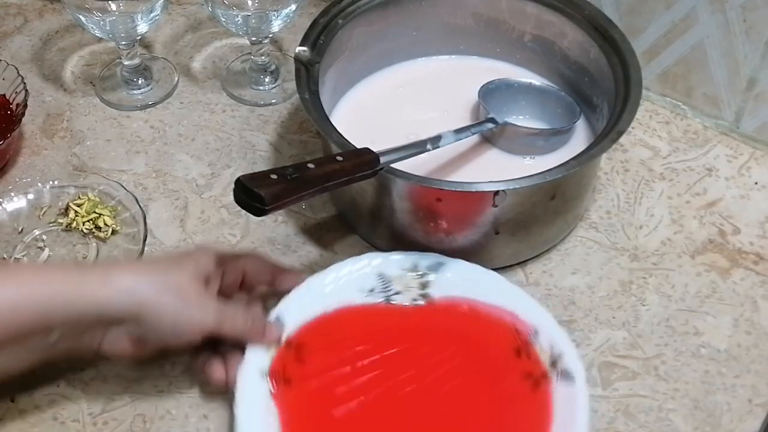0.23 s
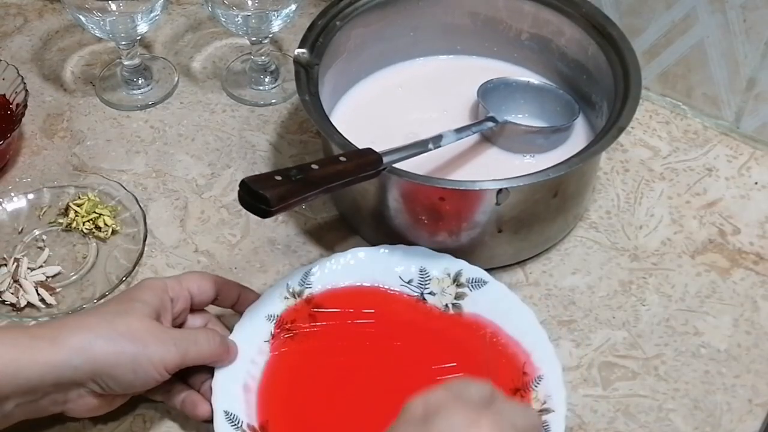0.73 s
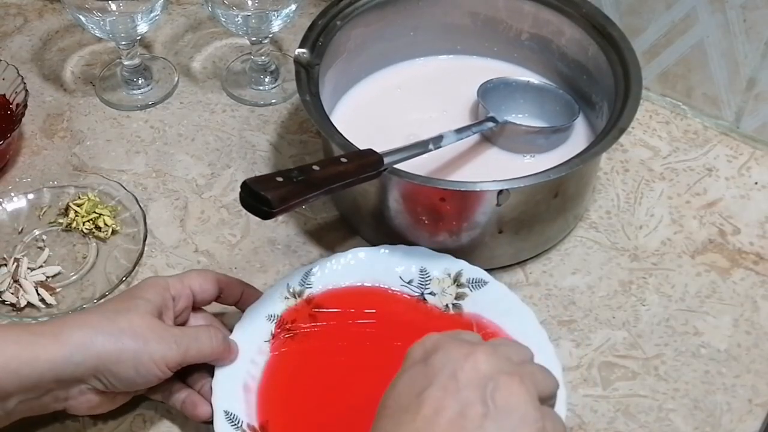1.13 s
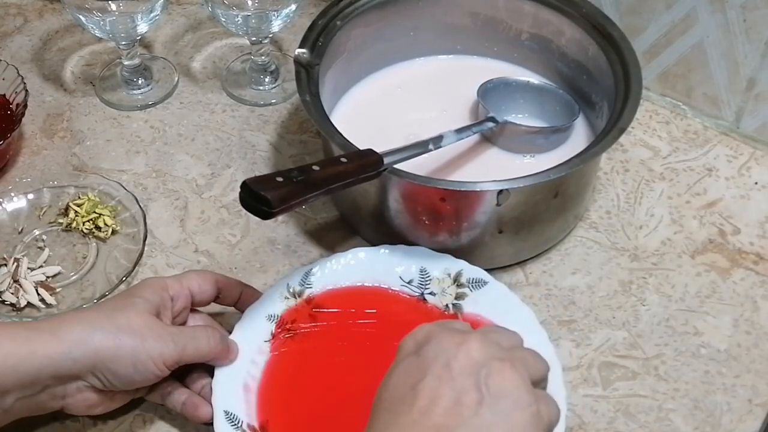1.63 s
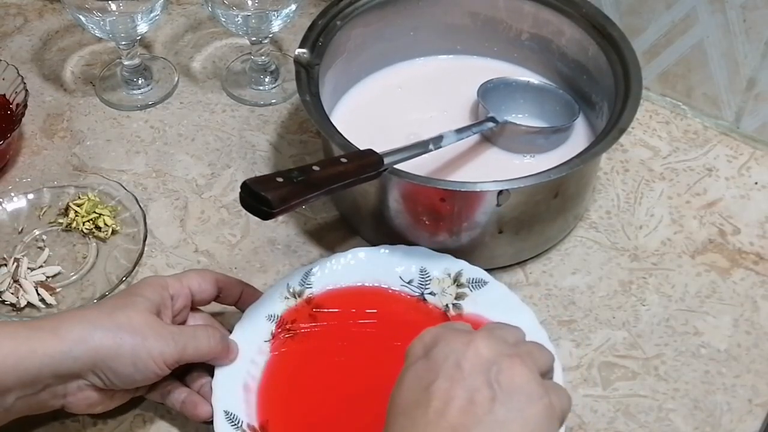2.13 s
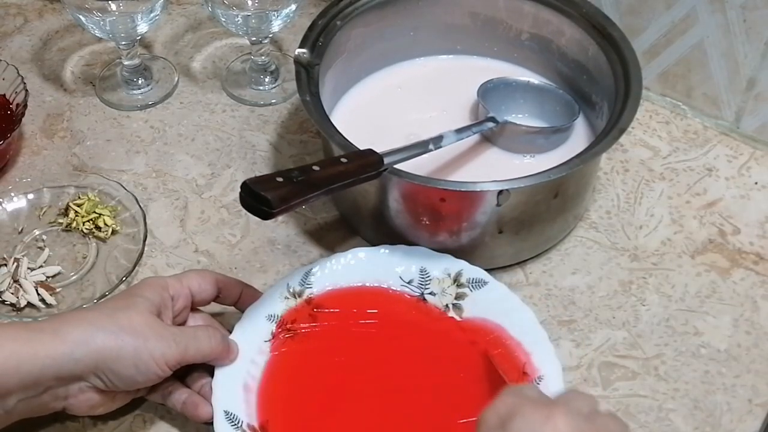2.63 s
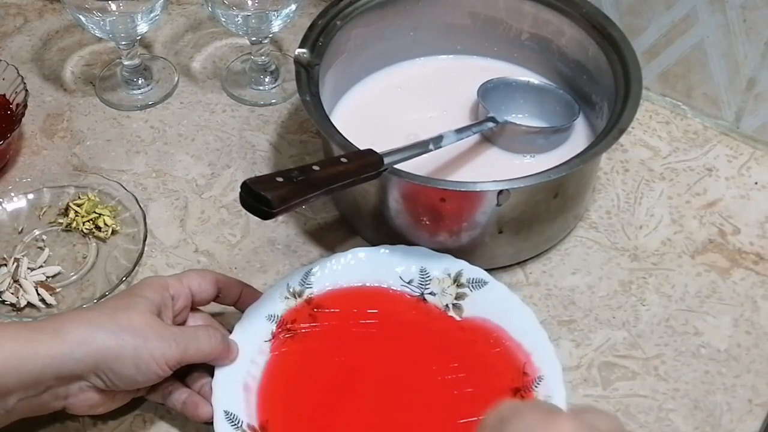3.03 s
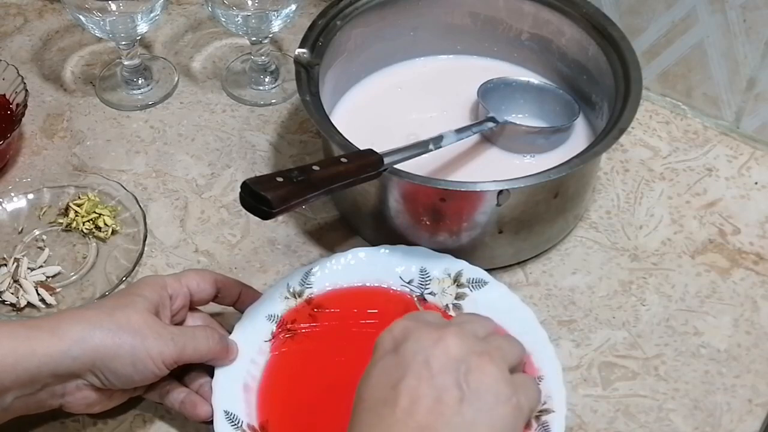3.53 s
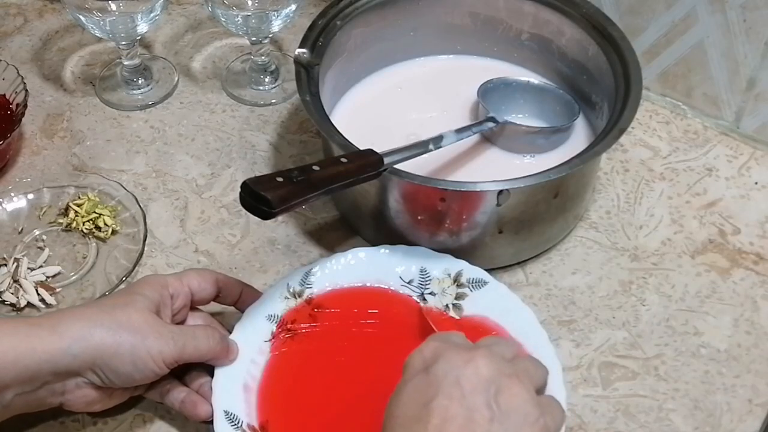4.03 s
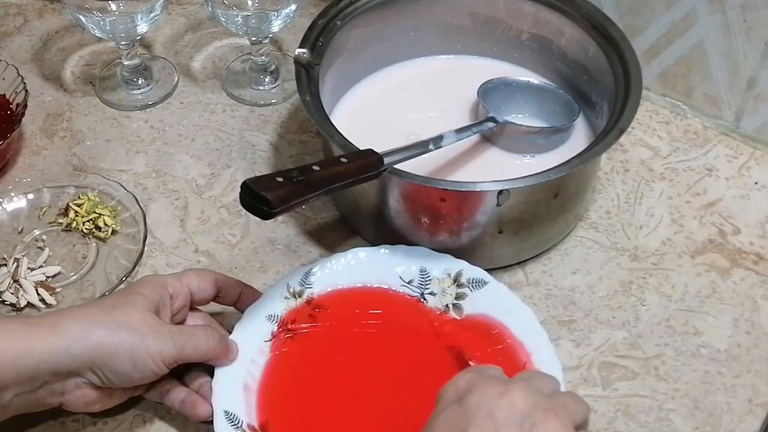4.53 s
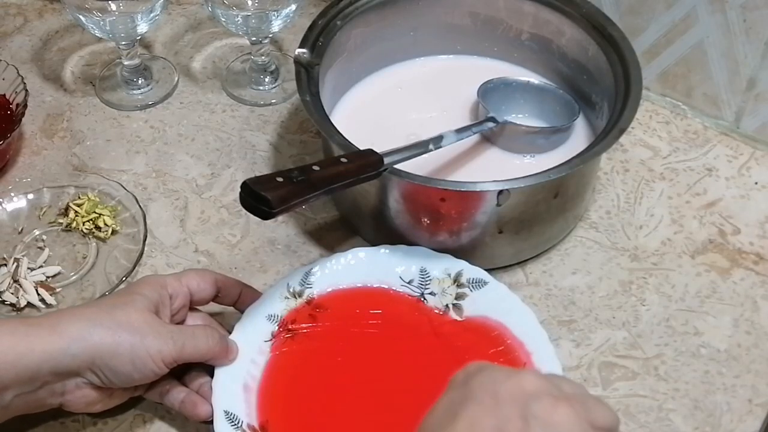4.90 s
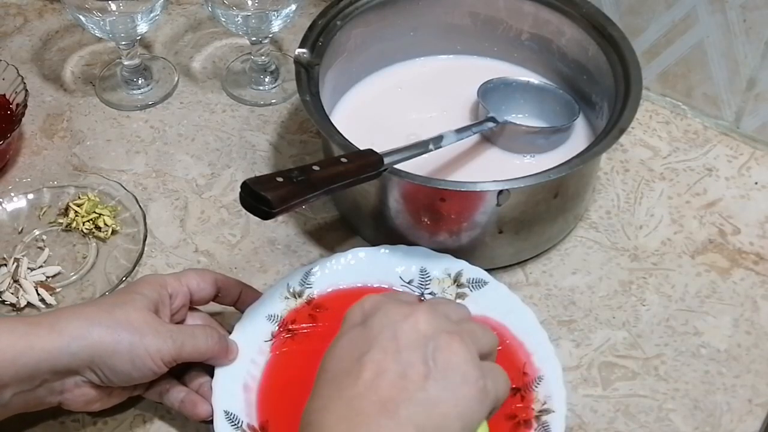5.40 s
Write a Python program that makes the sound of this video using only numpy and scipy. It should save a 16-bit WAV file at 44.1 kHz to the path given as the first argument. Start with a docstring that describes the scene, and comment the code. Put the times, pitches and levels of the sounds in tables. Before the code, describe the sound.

A small, quiet kitchen with a steady low hum and soft hiss is heard from close by. At about 0.2 seconds a china plate slides on a stone counter, then grinds to rest between 0.5 and 0.7 seconds, ringing lightly. A quiet stretch follows, with a faint judder near 1 second and a soft, dull knife tap at 2.2 seconds. At 3 seconds the steel tip, cutting through set jelly, strikes the plate in a quick run of bright clicks and squeaky scrapes, while the dragged plate judders softly until 3.5 seconds. The loudest click comes just before 4 seconds, followed by duller taps, scrapes and a small squeak until 4.3 seconds, with low juddering fading by 5 seconds. Another scrape then builds to a sharp tap at 5.2 seconds. The wet blade wipes faintly through the jelly from 5.4 to 5.7 seconds.

```python
"""A steel knife is drawn through set jelly in slow strokes, its tip tapping and scraping on a china plate.
Blows and tiny slips excite the modes of knife and plate; the wet blade wipes and squeaks faintly.
Before the cuts the plate is turned on a stone counter: its foot grinds and the china rings.
During them the dragged plate judders softly by stick and slip.
A small, quiet kitchen with a low hum, heard from close by."""
import sys
import numpy as np
from scipy import signal
from scipy.fft import rfft, irfft, next_fast_len
from scipy.io import wavfile
from scipy.ndimage import map_coordinates

SR = 44100
rng = np.random.default_rng(int(sys.argv[2]) if len(sys.argv) > 2 else 0)


def output_pcm(signal):
    """Save a mono or channel-first signal as 16-bit PCM at the path in sys.argv[1].

    Samples are clipped to [-1, 1] before scaling.
    """
    pcm = np.clip(np.atleast_2d(signal).T, -1, 1) * 32767
    wavfile.write(sys.argv[1], SR, np.round(pcm).astype(np.int16))


N = 249606
TIME_S = np.arange(N) / SR
FFT_SIZE = next_fast_len(N + SR // 5, True)
FREQ_HZ = np.fft.rfftfreq(FFT_SIZE, 1 / SR)

# Table levels are relative, ahead of normalising and mix gains.
# room air: freq_hz, level_db
AIR_SPECTRUM = [(20, -11.5), (38, -12.5), (55, -25.5), (130, -11), (190, -18), (300, -15.5), (450, -22.5),
                (1050, -32), (2200, -37.5), (2900, -37.5), (3900, -45.5), (5200, -40), (8500, -41.5),
                (11000, -49), (15500, -48.5)]
# left-right likeness of the air: freq_hz, correlation
AIR_CORRELATION = [(180, 0.85), (550, 0.58), (1650, 0.017)]
# appliance hum: pitch_hz, level_db
HUM_TONES = [(21.5, -54), (98, -66.5), (133, -68.5), (248, -67.5)]
# kitchen reverberation: freq_hz, t60_s
ROOM_DECAY = [(200, 0.18), (2000, 0.25), (6000, 0.23), (14000, 0.06)]

# flat of the blade wiping through jelly: start_s, length_s, level_db
BLADE_WIPES = [(4.67, 0.2, -67.5), (5.37, 0.29, -60.5), (5.61, 0.09, -54.5)]
# wet friction: freq_hz, level_db
WIPE_SPECTRUM = [(700, -26), (1800, -1), (2700, 1), (4000, -9), (7500, -6.5), (10000, -20), (15000, -27)]
# blade squeaks in jelly and on glaze: start_s, length_s, level_db, pitch_hz, glide_hz
BLADE_SQUEAKS = [(0.87, 0.29, -67, 1340, 130), (3.0045, 0.008, -24.5, 2780, 0),
                 (4.016, 0.026, -44, 1660, -60), (4.195, 0.06, -38, 1690, 0), (4.25, 0.2, -54, 1690, 0),
                 (4.42, 0.14, -72.5, 3520, 0)]
# faint high squeal in the first cut: time_s, pitch_hz, level_db
SQUEAL_PATH = [(2.04, 5300, -82), (2.13, 5300, -79), (2.21, 5120, -81), (2.29, 5950, -75.5),
               (2.36, 6170, -78.5), (2.43, 5950, -71), (2.47, 5550, -76), (2.5, 4600, -81)]

# dragged plate: start_s, length_s, level_db, pitch_hz, rough_db (re level)
PLATE_SHUDDERS = [(0.82, 0.34, -55, 130, -10), (2.975, 0.24, -40.5, 157, -5), (3.04, 0.075, -36, 158, -18),
                  (3.185, 0.135, -39.3, 159, -13), (3.32, 0.19, -44, 158, -12),
                  (3.895, 0.06, -45, 136, -14), (3.95, 0.15, -50, 136, -12), (4.09, 0.13, -43.5, 138, -14),
                  (4.22, 0.77, -50.5, 133, -11)]
# plate foot under light and heavy load: freq_hz, level_db
LIGHT_FOOT_SPECTRUM = [(200, -8.5), (350, -2), (1200, 1), (1700, -0.5), (2200, -12.5), (2850, -5),
                       (3800, -15), (5250, 1), (6050, -18), (6750, 0.5), (7500, -7), (8700, -10.5),
                       (9400, -11), (10500, -23), (15000, -21)]
HEAVY_FOOT_SPECTRUM = [(150, -27), (270, -2.5), (640, 0), (860, -11), (1150, 1), (1500, -12), (1880, -1),
                       (2150, -11), (3100, 0), (4100, -10), (5300, -0.5), (6100, -6), (7600, -3),
                       (10500, -17.5), (15000, -23)]
# resonances of the lightly sliding foot: freq_hz, width_hz, level_db
LIGHT_FOOT_MODES = [(750, 32, 12), (2864, 65, 3), (7530, 40, 6), (11600, 230, -9)]
# modes of the free plate: pitch_hz, level_db, t60_s
PLATE_MODES = [(651, -16, 0.35), (985, -7, 0.41), (1141, -6.5, 0.36), (1884, -4, 0.33), (2024, -11.5, 0.42),
               (2433, -4.5, 0.27), (2762, -9.5, 0.24), (3070, -7.5, 0.27), (3686, -13, 0.22),
               (7055, -13, 0.27)]

# knife and plate resonances, tip near the rim or in the well: freq_hz, width_hz, level_db
TIP_RIM_MODES = [(1810, 56, -1.5), (2580, 210, -1.3), (3030, 85, -6), (3850, 40, -5.5), (4330, 90, -16),
                 (5070, 34, -1.5), (5320, 75, -4.5), (6380, 55, -3), (7320, 60, -14), (9350, 130, -18)]
TIP_WELL_MODES = [(660, 90, -17.5), (1396, 70, -9), (1665, 62, 1), (1940, 85, -2.5), (2170, 130, -10),
                  (3845, 36, -13.5), (5270, 160, -18), (6350, 63, -17.5), (7400, 45, -19)]
# broad colour under those resonances: freq_hz, level_db
RIM_SPECTRUM = [(500, -23), (1000, -26.5), (1250, -10.5), (2500, -4), (3500, -11.5), (5200, -10),
                (7800, -8), (8700, -23.5), (11000, -20.5), (12000, -30), (15000, -32)]
WELL_SPECTRUM = [(350, -31.5), (650, -15), (980, -20.5), (1250, -1.5), (2000, -1), (2700, -9.5),
                 (3200, -21), (4500, -25.5), (7800, -11), (9000, -26), (11500, -31.5), (13000, -58)]
# tip blows: start_s, level_db, edge_db (treble gain), place (0 well to 1 rim)
TIP_TAPS = [(2.226, -36.5, -27, 0), (2.484, -51, -16, 0), (2.748, -52, 16, 1), (2.895, -50, 12, 1),
            (3.0063, -22.5, 5, 1), (3.1013, -25.5, 2, 1), (3.1512, -26, -3, 1), (3.9502, -18, 3, 0.25),
            (3.9537, -21.5, 6, 0.15), (3.9572, -21, 9, 0.24), (4.056, -37.5, -12, 0), (4.0918, -24.5, 0, 0),
            (4.1197, -28.5, -2, 0), (4.1665, -27, -3, 0.19), (4.2835, -30, -6, 0), (4.297, -30, -1, 0.1),
            (5.185, -22.5, -1, 0.58)]
# tip pulls over the glaze: start_s, length_s, level_db, growth_db, edge_db, place, chatter_hz
TIP_PULLS = [(3.002, 0.036, -43.5, -7, 1, 1, 2750), (3.046, 0.078, -38, 1, -3, 1, 2520),
             (3.122, 0.05, -39.3, -1, -2, 1, 2600), (3.196, 0.062, -39.5, -1, -3.7, 1, 2560),
             (3.965, 0.03, -46, -4, -9, 0, 1900), (4.072, 0.035, -44, -2, -14, 0, 2100),
             (4.162, 0.142, -38.6, -1, -15, 0, 1690), (4.998, 0.07, -41.7, -3, -7.5, 1, 2420),
             (5.074, 0.107, -39, 4, -4.3, 1, 2560), (5.176, 0.034, -35.2, -1, -1.5, 1, 2750)]


def amp(db):
    """Decibels to gain."""
    return 10 ** (np.asarray(db) / 20)


def unit_rms(x):
    """Scale to rms 1."""
    return x / np.sqrt(np.mean(np.abs(x) ** 2) + 1e-20)


def curve(points, hz=FREQ_HZ):
    """Interpolate (freq_hz, value) points on a log axis."""
    point_hz, values = np.transpose(points)
    return np.interp(np.log(hz + 1), np.log(point_hz), values)


def wobble(rate_hz):
    """Smooth random curve through Gaussian knots."""
    knots = rng.standard_normal(int(N * rate_hz / SR) + 4)
    grid = np.arange(len(knots) * 8) / 8
    return np.interp(TIME_S * rate_hz, grid, map_coordinates(knots, [grid], mode="nearest"))


def wavering(hz, drift, rate_hz):
    """Tone of rms 1; pitch strays at random by the fraction drift."""
    return np.sqrt(2) * np.sin(2 * np.pi * np.cumsum(hz * (1 + drift * wobble(rate_hz))) / SR)


def ramp(start_s, length_s):
    """0 to 1 over a gesture."""
    return np.clip((TIME_S - start_s) / length_s, 0, 1)


def swell(start_s, length_s):
    """Soft gesture: a broadened half sine."""
    return np.abs(np.sin(np.pi * ramp(start_s, length_s))) ** 0.85 * (TIME_S < start_s + length_s)


def held(start_s, length_s, attack_s, t60_s):
    """Firm gesture: attack, hold, release."""
    return ramp(start_s, attack_s) * amp(-60 * np.clip((TIME_S - start_s - length_s) / t60_s, 0, 2))


def filtered(x, response):
    """Apply a response given on FREQ_HZ."""
    return irfft(rfft(x, FFT_SIZE) * response, FFT_SIZE)[..., :N]


def body(modes, spectrum, broad_db=0):
    """Minimum-phase response of unit power: resonances on a broad colour."""
    power = amp(curve(spectrum) + broad_db) ** 2
    for hz, width_hz, db in modes:
        power += amp(db) ** 2 / (1 + ((FREQ_HZ - hz) / width_hz) ** 2) ** 2
    cepstrum = irfft(np.log(unit_rms(np.sqrt(power)) + 1e-6), FFT_SIZE)
    cepstrum[1:FFT_SIZE // 2] *= 2
    cepstrum[FFT_SIZE // 2 + 1:] = 0
    return np.exp(rfft(cepstrum))


def split_bands(response, crossover_hz=3400):
    """Dull and bright parts of a response; harder contact lifts the bright one."""
    treble = 1 / (1 + (crossover_hz / (FREQ_HZ + 1)) ** 12)
    return response * (1 - treble), response * treble


def slips(rate_hz, spread_db, clump_db):
    """Friction of rms 1: tiny slips, uneven in size and clumped."""
    at = np.flatnonzero(rng.random(N) < rate_hz / SR)
    out = np.zeros(N)
    spread = np.clip(rng.standard_normal(N)[at], -2, 2)
    out[at] = amp(spread_db * spread + clump_db * wobble(140)[at]) * np.sign(rng.random(N)[at] - .5)
    return unit_rms(out)


def in_room(x, near_db, tail_db, pan_db):
    """Direct sound, quick scatter from nearby surfaces and the kitchen's tail, per ear."""
    hz, frame_s, noise = signal.stft(rng.standard_normal((2, SR // 3)), SR, nperseg=256)
    decay = amp(-60 * frame_s / curve(ROOM_DECAY, hz)[:, None])
    tail = signal.istft(noise * decay, SR, nperseg=256)[1]

    def echo(paths):
        return filtered(x, rfft(paths / np.linalg.norm(paths[0]), FFT_SIZE))

    def scatter(t60_s=0.024):
        delay_s = TIME_S[:SR // 50]
        return echo(rng.standard_normal((2, len(delay_s))) * amp(-60 * delay_s / t60_s))

    sway = 2 * np.pi * 4 * TIME_S  # moving hands change the short paths
    near = np.cos(sway) * scatter() + np.sin(sway) * scatter()
    direct = np.array([np.roll(x, 4), x])  # left ear 4 samples late
    mix = direct + amp(near_db) * near + amp(tail_db) * echo(tail)
    norm = np.sqrt(1 + (amp(near_db) ** 2 + amp(tail_db) ** 2) / 2)
    return mix / norm * amp([[pan_db / 2], [-pan_db / 2]])


def background():
    """Room air, appliance hum and a narrow hiss, stronger on the right."""
    angle = np.arccos(np.clip(curve(AIR_CORRELATION), 0, 1)) / 2
    colour = amp(curve(AIR_SPECTRUM)) * [np.cos(angle), np.sin(angle)]
    mid, side = filtered(rng.standard_normal((2, N)), colour)
    air = amp(-54.5 + 1.5 * wobble(5.56)) * unit_rms(np.array([mid + side, mid - side]))
    hum = sum(amp(db + wobble(7.3)) * wavering(hz, drift=0.01598, rate_hz=12) for hz, db in HUM_TONES)
    hiss = unit_rms(filtered(rng.standard_normal((2, N)), 1 / (1 + ((FREQ_HZ - 7150) / 380) ** 2)))
    return air + hum + hiss * amp([[-82], [-72]])


def wet_blade():
    """The blade wipes through jelly and squeaks; lower squeaks are rougher."""
    path_s, path_hz, path_db = np.transpose(SQUEAL_PATH)
    gate = (TIME_S > path_s[0]) * (TIME_S < path_s[-1])
    voices = [(gate * amp(np.interp(TIME_S, path_s, path_db)), np.interp(TIME_S, path_s, path_hz))]
    for start_s, length_s, db, pitch_hz, glide_hz in BLADE_SQUEAKS:
        hz = pitch_hz + glide_hz * (ramp(start_s, length_s) - .5)
        voices.append((amp(db) * swell(start_s, length_s), hz))
    squeaks = sum(gain * amp(3.5 * wobble(80)) * wavering(hz, drift=85 / hz, rate_hz=500)
                  for gain, hz in voices)
    force = sum(amp(db) * swell(start_s, length_s) for start_s, length_s, db in BLADE_WIPES)
    wipe = force * filtered(slips(5000, spread_db=2, clump_db=1), body([], WIPE_SPECTRUM))
    return in_room(squeaks + wipe, near_db=7.5, tail_db=2.5, pan_db=-2)


def plate_judder():
    """Stick and slip shakes the plate: a low tone under a rough murmur."""
    force, weighted_hz, murmur_gain = 1e-9, 0, 0
    for start_s, length_s, db, pitch_hz, rough_db in PLATE_SHUDDERS:
        push = amp(db) * swell(start_s, length_s)
        force += push
        weighted_hz += push * pitch_hz
        murmur_gain += push * amp(rough_db)
    colour = amp(curve([(80, -22), (135, 3), (205, -6), (290, 0), (750, -15), (1200, -48)]))
    murmur = murmur_gain * unit_rms(filtered(slips(1500, spread_db=2, clump_db=1), colour))
    shake = force * amp(1.5 * wobble(30)) * wavering(weighted_hz / force, drift=0.048, rate_hz=40)
    return (shake + murmur) * amp([[-1.5], [1]])


def china_ring(grind):
    """Each plate mode stores grinding energy and releases it at its own rate."""
    out = np.zeros(N)
    for hz, db, t60_s in PLATE_MODES:
        retained = amp(-60 / (t60_s * SR)) ** 2
        energy = signal.lfilter([1 - retained], [1, -retained], grind ** 2 + 1e-20)
        out += amp(db) * np.sqrt(energy) * wavering(hz, drift=0.00397, rate_hz=60)
    return out


def plate_turn(nudge_s=0.229, drop_s=0.497, brake_s=0.203):
    """The foot slides lightly on stone, drops, then grinds to rest and rings the china."""
    breakaway = amp(4 * swell(nudge_s, 0.055))  # harder rasp as it comes unstuck
    slide = amp(-48) * ramp(nudge_s, 0.008) * (TIME_S < drop_s) * breakaway
    rasp = slide * slips(3000, spread_db=2.4, clump_db=1.3)
    light = filtered(rasp, body(LIGHT_FOOT_MODES, LIGHT_FOOT_SPECTRUM))
    speed = (TIME_S >= drop_s) * (1 - ramp(drop_s, brake_s) ** 2)
    grind = amp(-31) * speed ** 2.5 * slips(7000, spread_db=2.7, clump_db=0.58)
    landing = amp(-26.5) * held(drop_s, 0.004, attack_s=0.004, t60_s=0.03)
    grind += landing * slips(11000, spread_db=1, clump_db=0)
    heavy = filtered(grind, body([], HEAVY_FOOT_SPECTRUM))
    foot = in_room(light + amp(-1) * heavy, near_db=3, tail_db=-2, pan_db=0)
    return foot + amp(-9) * in_room(china_ring(grind), near_db=-4.5, tail_db=-9.5, pan_db=1)


def tip_pressure(place, edge_rise_db=3.5):
    """Force, treble gain and chatter pitch at one place; each pull brightens as the blade tilts."""
    force, edge, pitch_hz = np.zeros(N), np.ones(N), np.zeros(N)
    for start_s, length_s, db, growth_db, edge_db, pull_place, chatter_hz in TIP_PULLS:
        if pull_place == place:
            tilt = ramp(start_s, length_s) - .5
            bite = held(start_s, length_s, attack_s=0.014, t60_s=0.145)
            force = np.maximum(force, bite * amp(db + growth_db * tilt))
            edge = np.where(TIME_S >= start_s, amp(edge_db + edge_rise_db * tilt), edge)
            pitch_hz[TIME_S >= start_s] = chatter_hz
    return force, edge, pitch_hz


def wander(x, swing_s=0.00035, rate_hz=9):
    """Resonances sway as the jelly shifts on the blade."""
    return map_coordinates(x, [(TIME_S + swing_s * wobble(rate_hz)) * SR], mode="nearest")


def tip_scrape(response, place, slip_rate_hz, chatter_db=-13):
    """The tip catches on the glaze; slips partly lock into a squeal, which harder contact breaks up."""
    force, edge, chatter_hz = tip_pressure(place)
    locked = amp(chatter_db) / np.sqrt(edge)
    force /= np.sqrt(1 + locked ** 2)
    grit = force * slips(slip_rate_hz, spread_db=2.6, clump_db=0.8)
    dull, bright = split_bands(response)
    rasp = filtered(grit, unit_rms(dull)) + amp(2.5) * filtered(edge * grit, unit_rms(bright))
    tone = wavering(chatter_hz, drift=0.0309, rate_hz=600)
    octave = tone ** 2 - 1
    squeal = force * locked * unit_rms(amp(2 * wobble(110))) * (tone + edge ** 2 * octave)
    return wander(rasp) + squeal


def tip_taps(well, rim, cushion_hz=9000):
    """Single blows, cushioned by jelly and coloured by where they land."""
    out = np.zeros(N)
    cushion = 1 / (1 + 1j * FREQ_HZ / cushion_hz) ** 2
    well_ring, rim_ring = (irfft(np.array(split_bands(response * cushion)), FFT_SIZE)[:, :SR // 4]
                           for response in (well, rim))
    for start_s, db, edge_db, place in TIP_TAPS:
        dull, bright = (1 - place) * well_ring + place * rim_ring
        blow = dull + amp(edge_db) * bright
        out[round(start_s * SR):][:len(blow)] += amp(db) * blow / np.abs(blow).max()
    return out


def knife():
    """Steel on glaze: bright near the rim, dulled by jelly in the well."""
    well = body(TIP_WELL_MODES, WELL_SPECTRUM, broad_db=-12)
    rim = body(TIP_RIM_MODES, RIM_SPECTRUM, broad_db=-7)
    rim_scrape = amp(-2) * tip_scrape(rim, place=1, slip_rate_hz=4000)
    well_scrape = amp(-3) * tip_scrape(well, place=0, slip_rate_hz=1800)
    return (in_room(rim_scrape, near_db=7, tail_db=-0.5, pan_db=-3)
            + in_room(well_scrape, near_db=3, tail_db=-1.5, pan_db=0)
            + amp(1) * in_room(tip_taps(well, rim), near_db=0, tail_db=-0.5, pan_db=-1))


def scene():
    """Stereo sum of all sources."""
    return plate_turn() + knife() + plate_judder() + wet_blade() + background()


def record(dry):
    """Brick-wall low-pass."""
    return filtered(dry, FREQ_HZ < 15700)


dry = scene()
out = record(dry)
output_pcm(out)
```